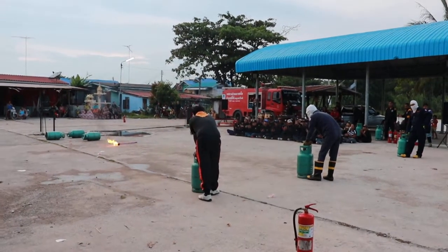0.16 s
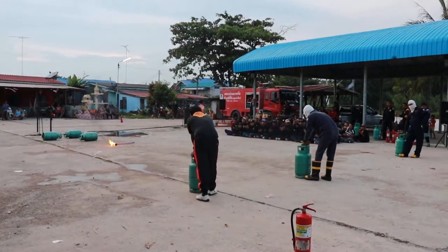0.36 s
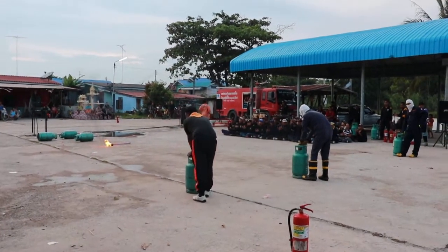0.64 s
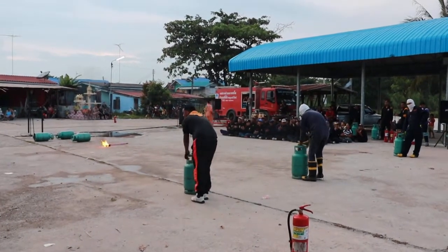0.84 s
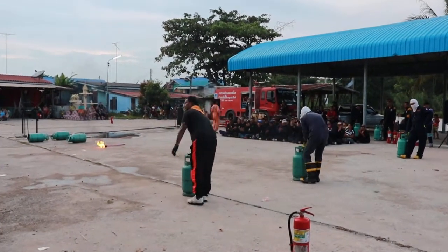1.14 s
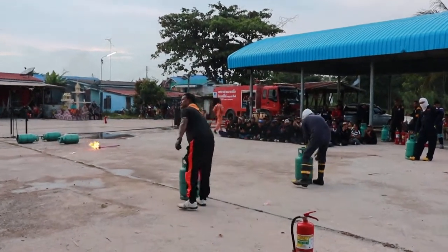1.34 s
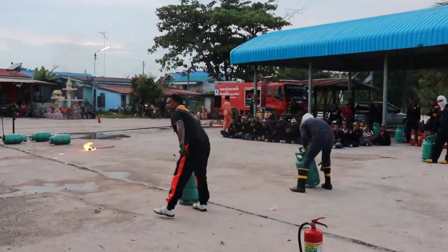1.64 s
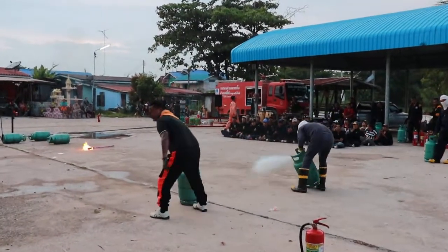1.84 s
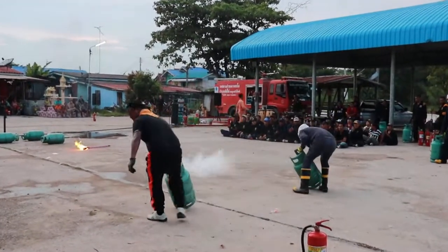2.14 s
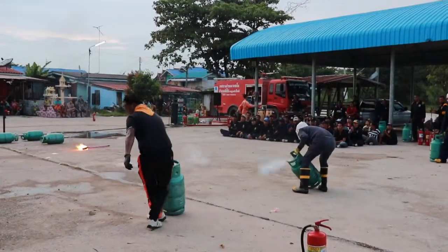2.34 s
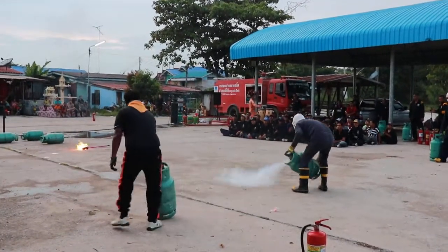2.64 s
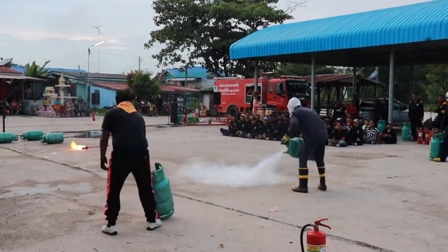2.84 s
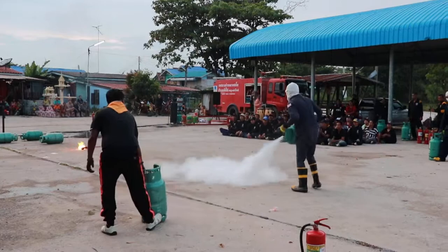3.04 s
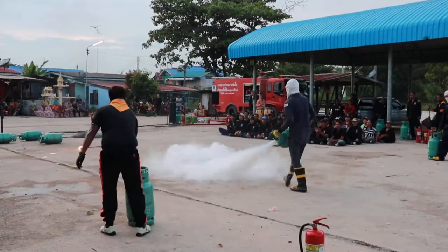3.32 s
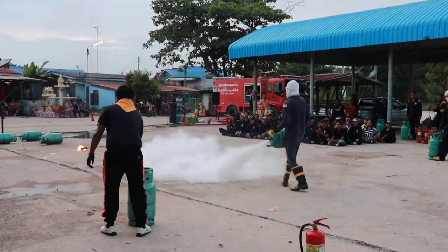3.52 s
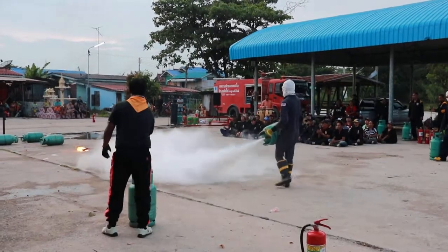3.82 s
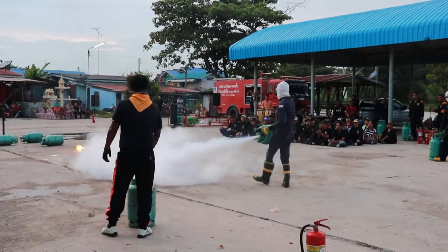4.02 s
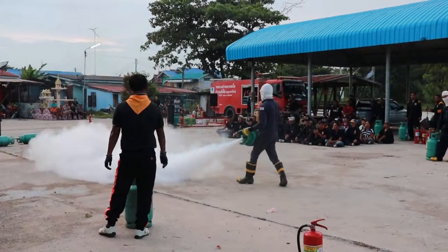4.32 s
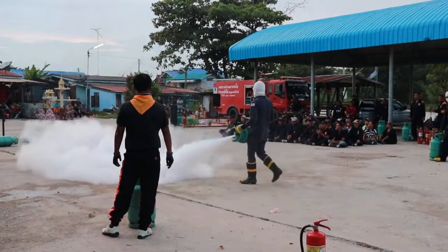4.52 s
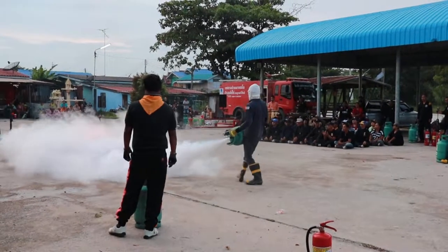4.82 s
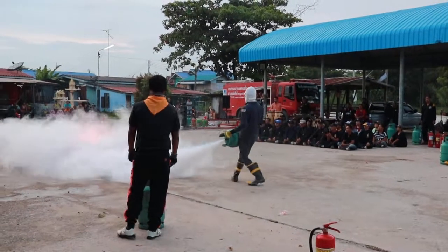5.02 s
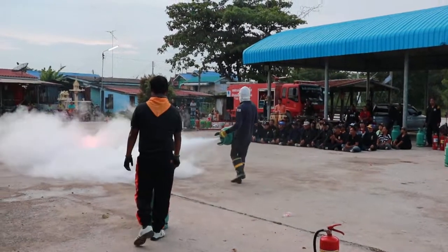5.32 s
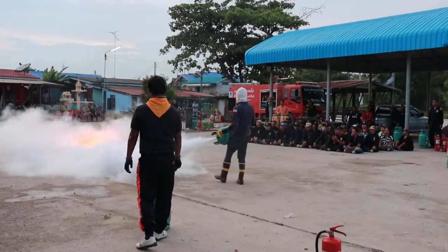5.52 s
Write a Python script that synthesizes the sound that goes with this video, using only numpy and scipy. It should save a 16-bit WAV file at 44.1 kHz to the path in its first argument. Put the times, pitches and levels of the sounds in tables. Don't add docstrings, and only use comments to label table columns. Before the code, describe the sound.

A strong, steady gas hiss begins at once in an open concrete yard, with a whistling core near 1.8 kHz and bright fizz above. Until about 1.8 s, dull, hollow valve-wheel knocks come irregularly, each with short yard echoes, while the fizz tightens and drops with the turns. From 1.35 to 2.05 s, sharp little finger ticks sit almost wholly at the left, with another near 2.9 s. The hiss dips briefly around 1.95 s. From 2.1 to 3.6 s, the tipped steel cylinder scrapes in stuttering metallic rings, strongest near 2.4 s; a faint ring returns at 4.9 s. Between 2.55 and 3.05 s the whistle yields to a broader, gusting jet. It swells near 3.6-4.15 s, eases, then surges again around 5.25 s. Low flame rumble rises from 3.1 s, strongest near 3.45 s, and continues to the end at about 5.6 s. A far engine idles very faintly throughout.

```python
import sys
import numpy as np
from scipy import signal
from scipy.fft import rfft, irfft
from scipy.io import wavfile
from scipy.ndimage import uniform_filter1d

SR = 44100
rng = np.random.default_rng(int(sys.argv[2]) if len(sys.argv) > 2 else 0)


def inscribe(sig):
    pcm = np.round(np.clip(np.atleast_2d(sig).T, -1, 1) * 32767)
    wavfile.write(sys.argv[1], SR, pcm.astype(np.int16))


def rack_gain(trim_db):
    fader = np.asarray(trim_db, float)
    return 10 ** (fader / 20)


N = 249606


def read(points, hz):
    f, value = np.transpose(points)
    return np.interp(np.log(hz + 1), np.log(f + 1), value)


def evened(x):
    return x / np.sqrt(np.mean(x ** 2) + 1e-20)


def add(mix, s, sound):
    part = mix[..., round(s * SR):][..., :sound.shape[-1]]
    part += sound[..., :part.shape[-1]]


def fuzz(x, width_hz):
    return signal.lfilter([1], [1, -np.exp(-np.pi * width_hz / SR)], x)


def blotches(shape, tall, long):
    field = rng.standard_normal(shape[::-1]).T
    for _ in range(2):
        field = uniform_filter1d(field, tall, axis=0)
        field = uniform_filter1d(field, long, axis=1)
    return evened(field)


def lasting(t, start, end):
    return np.clip(np.minimum(t - start, end - t) / .12, 0, 1)


def yard_db(hz, t):
    # (from t/s, to t/s, delay/ms, ripple/dB)
    echoes = [(-.3, 1.5, 1.02, .7), (.9, 2.05, 1.55, 2.2), (2.3, 3.05, 2.24, 2.), (2.3, 3.05, .99, 1.8),
              (2.95, 3.85, 1.38, 2.8), (3.75, 4.35, 1.24, 3.), (3.7, 4.95, 1.78, 1.8),
              (4.25, 4.85, 1.36, 2.6), (4.25, 4.95, 2.18, 1.8), (4.65, 5.15, 1.57, 2.),
              (4.85, 6., 1.92, 2.6), (4.85, 6., 1.05, 1.6)]
    hollows = [
        (1.97, 2.788, 920, 150., -6.5),
        (2, 3.334, 1520, 139, -3.5),
        (3.99, 4.27, 1600, 159, -11),
        (4.0, 4.425, 650, 198.9, -1),
    ]
    ridges = [
        (-.3, 1.9, 1850, 130., 4.5),
        (-.3, 2.3, 3000, 250., -5.),
        (3.65, 4.98, 5040, 110., 5.),
        (4.85, 6., 3780, 140., 3.5),
    ]
    # (from t/s, to t/s, f/Hz, width/Hz, level/dB)
    band_swells = [(0.4, 0.73, 1930, 270, 3.5), (0.92, 1.63, 1630, 210, 1), (1.19, 1.42, 2120, 150, -13),
                   (1.85, 2.135, 1620, 610, 6), (2.614, 2.846, 1750, 220, 10.5), (3.59, 3.95, 2300, 580, 4.5),
                   (3.98, 4.22, 11300, 5900, 5.5), (4.35, 4.9, 2080, 130, 4.5), (4.3, 4.94, 2970, 390, 2.5),
                   (2.86, 3.72, 5470, 220, 9), (4.57, 5.8, 11200, 810, 5.5), (4.3, 4.75, 1580, 250, -4.5),
                   (5.0, 5.75, 4450, 400., 2), (2.56, 2.92, 570, 170, 4.5), (1.6, 2.12, 1510, 110, -10.5),
                   (3.26, 4.2, 3670, 200., 2.5), (3.66, 4.25, 4550, 440, -2), (3.97, 4.18, 2080, 180, 8),
                   (4.95, 5.8, 3160, 310, -2), (2.9, 3, 11000, 1100, -2), (3, 3.8, 840, 86, 4.5),
                   (0, 1.05, 12600, 830, -6), (0.5, 1.56, 14500, 600., 5), (2, 2.9, 12300, 800, 4),
              (1.6, 2.9, 9200, 240, -3.5), (1.5, 2.95, 8100, 210, -2), (1.5, 2.9, 14600, 500., 5.5),
              (1.8, 2.1, 14600, 1200., -5), (2, 2.08, 10300, 290, -5), (3.15, 5.9, 15400, 300., -3),
              (-.3, 1.05, 11000, 220, -2.5), (2.5, 2.84, 9700, 400., 4), (3, 2.5, 10300, 600., -2.5),
              (2, 3.24, 8400, 480, 5), (4.15, 4.7, 10000, 400., -3), (.78, 1.12, 2200, 270, 3),
              (1, 1.59, 1880, 93, 4), (1.7, 2.26, 1980, 110., -5), (2.3, 2.4, 2250, 89, 4),
              (2, 2.66, 1760, 97, -5.5), (5, 5.9, 1860, 150., -3.5), (4, 5.15, 2400, 110, 2.5),
              (3.5, 4.8, 1830, 73, -3.5), (3.5, 4.2, 1550, 160, -4), (3.5, 4.1, 180, 180, 3.5),
              (3.5, 4.8, 280, 33, -3), (3.1, 3.66, 480, 70., -2), (4.5, 6.6, 276, 81, 3),
              (2.82, 3.23, 1620, 140., -7), (1.5, 1.38, 1830, 140, 2), (1.7, 2.48, 1800, 180, 4),
              (0.7, .7, 1480, 120., -3), (.95, 1.32, 1940, 90., -3), (5, 5.3, 1780, 160, -2),
              (1.5, 2.1, 10900, 180, -2.5), (3.95, 4.5, 2200, 140, -2), (5.45, 5.9, 690, 51, 5.5),
              (1.5, 2.15, 2250, 130, 3.5), (2.3, 2.78, 9800, 1300, -2), (2.5, 2.7, 800, 250., -2.5),
              (5, 5.15, 1700, 200., -2),
                   (1.5, 1.95, 6400, 300., 6), (-.2, 0.35, 5300, 220., -5), (3.5, 3.75, 4920, 150, -5),
              (1, 1.25, 6200, 230, -3), (2, 1.85, 3300, 200., -5), (1.5, 2.23, 3620, 200., -4.5),
              (2.5, 3.05, 6400, 300., 4), (3.15, 3.5, 6590, 220., -4), (2.55, 3.1, 3100, 160, -4),
              (.85, 1.2, 3850, 200., -4), (0.5, 0.28, 4100, 200, -2.5), (1.5, 1.87, 4100, 330, 3.5),
              (3.3, 5.9, 15600, 220., -3.5), (-.2, 0.12, 9850, 320, 5), (2.2, 2.55, 14850, 500., -4),
              (1.0, 1.35, 2550, 200., -4), (1.8, 2.05, 10600, 400., -4), (2, 1.76, 8300, 450., 5),
              (3.5, 4.08, 7750, 450., -5), (3.5, 5, 11200, 400., -4), (1, 0.93, 1750, 200., 3),
              (1.0, 1.4, 1820, 110, 2.5), (1.0, 1.26, 2300, 180, -1.5), (2.55, 2.9, 1570, 90., -4),
              (2.05, 2.4, 880, 130., -4), (0.5, .6, 690, 130., 4), (1, 1.7, 2800, 150., 4.5),
              (2.92, 3.25, 1460, 130., -3), (2.35, 2.6, 2030, 60., 5), (2, 3.2, 2200, 120., -6),
              (0.6, 1.1, 1390, 120, -3), (1.5, 1.73, 104, 50., 6), (5, 5.3, 110, 60., 5),
              (4, 5.0, 260, 43, -3), (4, 3.8, 110, 45, 4), (4.5, 4.8, 2260, 250., 1.5),
              (5.5, 5.5, 4200, 410, 1.5), (2, 1.95, 10200, 460, 2.5), (2.5, 2.45, 1560, 100., -3),
              (2, 1.85, 1740, 110, 2)]
    upper = np.interp(hz, [2500, 3500, 7500, 12000], [0, 1, 1, .4])
    total_db = np.zeros((len(hz), len(t)))
    for start, end, delay_ms, ripple_db in echoes:
        comb = upper * np.cos(2 * np.pi * hz * delay_ms / 1000)
        total_db += ripple_db * np.outer(comb, lasting(t, start, end))
    for start, end, f, width_hz, db in hollows + ridges + band_swells:
        bump = np.exp(-((hz - f) / width_hz) ** 2)
        total_db += db * np.outer(bump, lasting(t, start, end))
    return total_db


def turns_db(hz, t):
    # (step t/s, level/dB)
    turns = [
        (.312, 3.),
        (.592, 2.5),
        (.868, 2.5),
        (1.19, 0.5),
        (1.885, 5.),
        (2.03, -4.),
        (2.4, 1.5),
        (2.645, 1.5),
        (2.87, 2),
        (2.96, 2.5),
    ]
    squeeze_s, recover_s = 0.049, 0.064
    saw_db = np.zeros(len(t))
    for s, db in turns:
        rise, dip = np.exp(-abs(t - s) / squeeze_s), -np.exp(-abs(t - s) / recover_s)
        saw_db += db * np.where(t < s, rise, dip)
    return np.outer(np.interp(hz, [2500., 7000., 9500.], [0, .4, 1.1]), saw_db)


def layered(curve, law, usual_db, slides=()):
    s, level_db, pose = np.transpose(curve)
    bands_db = [level_db] + [db + share * (level_db - usual_db) + gain_db * pose for db, share, gain_db in law]
    centres_hz = [hz + per_s * (s - s[0]) + by_pose * pose for hz, per_s, by_pose in slides]
    return s, bands_db, centres_hz


def turbulence(layers, bands, left, right, same, turn, streak_db, patch_db, flicker_db, humps=(), frame=512):
    hz, t, z = signal.stft(rng.standard_normal((N, 2)).T, SR, nperseg=frame, noverlap=frame * 3 // 4)
    l, r = rack_gain(read(left, hz)), rack_gain(read(right, hz))
    c = np.clip(1.23 * read(same, hz), 0, .97)
    spin = np.exp(1j * read(turn, hz))
    centre = (l ** 2 + r ** 2 + 2 * l * r * c * spin.real) / 4 / len(hz)
    rest_db = [10 * np.log10(centre[(hz >= lo) & (hz < hi)].sum()) for lo, hi in bands]
    s, bands_db, centres_hz = layers
    lift_db = [np.interp(t, s, band_db) - rest for band_db, rest in zip(bands_db, rest_db)]
    mids = np.log(np.prod(bands, axis=1)) / 2
    order = np.argsort(mids)
    weights = np.array([np.interp(np.log(hz + 1), mids[order], order == k) for k in range(len(bands))])
    field = weights.T @ np.array(lift_db)
    for centre_hz, (hump_db, width_hz) in zip(centres_hz, humps):
        here = np.exp(-((hz[:, None] - np.interp(t, s, centre_hz)) / width_hz) ** 2)
        field += hump_db * (here - here.mean(1, keepdims=True))
    field += yard_db(hz, t) + turns_db(hz, t)
    field += streak_db * blotches(field.shape, tall=2, long=60)
    field += patch_db * blotches(field.shape, tall=5, long=12)
    field += flicker_db * blotches(field.shape, tall=120, long=2)
    at_left = (l * spin)[:, None] * z[0]
    at_right = r[:, None] * (c[:, None] * z[0] + np.sqrt(1 - c ** 2)[:, None] * z[1])
    pair = np.array([at_left, at_right]) * rack_gain(field)
    return signal.istft(pair, SR, nperseg=frame, noverlap=frame * 3 // 4)[1][:, :N]


def idle():
    # (f/Hz, level/dB, width/Hz)
    orders = [
        (50.6, -71, 5.2),
        (106.6, -66, 5),
    ]
    out, t = np.zeros(N), np.arange(N) / SR
    for hz, db, width_hz in orders:
        sway = fuzz(rng.standard_normal((N, 2)) @ [1, 1j], width_hz)
        out += rack_gain(db) * evened((sway * np.exp(2j * np.pi * hz * t)).real)
    return out * rack_gain([[1.4], [-1.6]])


def rumble():
    # (t/s, level/dB, gas cloud at the flame 0-1)
    flow = [(0.0, -56, 0.01), (1.3, -55.5, 0), (1.6, -55, 0.85), (2.0, -52.5, 0.1), (2.5, -55.5, 0.4),
            (3.1, -51.5, 0.9), (3.45, -44, 1), (4.05, -46.5, 0.4), (4.2, -47.5, 0.7), (4.8, -46, 0.95),
            (5.66, -49, 0.94)]
    # (low f/Hz, high f/Hz)
    bands = [
        (250, 600),
        (40, 250),
        (680, 1100),
    ]
    # (usual level/dB, share of level changes followed, gain by cloud/dB)
    law = [
        (-61, 0.55, 10),
        (-47, 0.47, 1.5),
    ]
    # (f/Hz, level/dB per Hz)
    left = [(15, -58), (25, -26), (41, -12), (75, -11.5), (102, -4.5), (233, -2.5), (357, -1), (399, -6),
            (593, -6.5), (867, -16), (1100, -10.5), (1430, -10), (2420, -120)]
    right = [(f, db - 3.2) for f, db in left]
    same, turn = [(30., 0.41), (150., 0.76), (800., 0.71)], [(30., 0.), (800., 0.0086)]
    return turbulence(layered(flow, law, usual_db=-50), bands, left, right, same, turn,
                      streak_db=-1.5, patch_db=1.0, flicker_db=0.98, frame=2048)


def knocks():
    # (t/s, peak level/dB, f/Hz, one third of echo t60/s)
    blows = [(0.019, -30, 1090, 0.055), (0.257, -33, 550, 0.04), (0.297, -28, 1040, 0.06),
             (0.457, -42, 322, 0.042), (0.495, -36.5, 460, 0.033), (0.564, -28.5, 940, 0.09),
             (0.655, -30, 1090, 0.05), (0.743, -33.5, 446, 0.016), (0.843, -26, 950, 0.042),
             (0.997, -38, 483, 0.023), (1.136, -27, 880, 0.14), (1.259, -36.5, 507, 0.027),
             (1.43, -25, 1060, 0.12), (1.527, -36, 400, 0.026), (1.747, -29.5, 902, 0.067),
             (2.342, -43, 633, 0.033), (3.534, -29, 945, 0.064), (.02, -39, 450, .03),
             (.705, -35, 1090, .04), (1.163, -38, 500, .05), (1.21, -35, 1040, .03), (1.805, -41, 500, .03),
             (1.905, -40, 775, .04), (1.992, -32, 1200, .03), (.268, -36, 800, .04), (.462, -37, 620, .04),
             (.11, -41, 600, .03), (1.265, -38, 700, .03), (.8, -35, 850, .03), (1.18, -40, 450, .04),
             (2.03, -37, 650, .06), (2.085, -37, 520, .03), (.555, -33, 1250, .03)]
    echo_gain = 0.71
    out, t = np.zeros((2, N)), np.arange(3000) / SR
    chance = rng.random((len(blows), 2, 16))
    for (s, db, hz, t60), draw in zip(blows, chance):
        decay = rack_gain(db - 60 * t / (8.4 / hz))
        blow = decay * np.sin(2 * np.pi * hz * t) * (1 - np.exp(-t / 0.00054))
        echoes = np.zeros((2, 3000))
        at = (100 + 2400 * draw[:, :8]).astype(int)
        sign = np.sign(draw[:, 8:] - .5)
        np.put_along_axis(echoes, at, echo_gain * sign * rack_gain(-60 * at / SR / max(3 * t60, .01)), 1)
        echoes[:, 0] = 1
        add(out, s, 2.8 * signal.fftconvolve(blow[None], echoes, axes=1))
    return out * rack_gain([[.7], [-.8]])


def ticks():
    # (t/s, peak level/dB, width factor)
    pushes = [(1.349, -41, 0.53), (1.383, -31, 1.5), (1.419, -29.5, 1.13), (1.454, -30, 0.93),
              (1.499, -24.5, 0.76), (1.559, -23, 0.96), (1.653, -23.5, 0.98), (1.84, -24.5, 0.79),
              (1.946, -22.5, 1.3), (1.987, -25, 1.04), (2.028, -24.5, 1.04), (2.341, -41, 0.94),
              (2.932, -28, 1.4)]
    out, t = np.zeros(N), np.arange(500) / SR
    fade = np.hanning(2 * len(t))[len(t):]
    for s, db, wide in pushes:
        u = t / (0.00048 * wide)
        shape = np.sin(np.pi * u ** .56) * np.exp(-u / 7)
        add(out, s + 0.00508, rack_gain(db + 5.0) * shape * fade)
    return out * rack_gain([[0.], [-24.]])


def cylinder():
    # (f/Hz, width/Hz, wander/rad)
    wall = [
        (622, 16., .9),
        (1270, 9., .35),
        (1862, 6., .8),
        (2616, 16., 1.),
    ]
    # (t/s, length/s, level/dB)
    drags = [
        [(2.12, .1, -53), (2.335, 0.019, -42), (2.39, 0.11, -44), (2.52, 0.068, -51), (2.6, .08, -55),
         (2.73, .04, -49), (3.05, 0.087, -51.5), (3.14, 0.15, -45), (3.3, .05, -52), (4.93, .06, -45)],
        [(2.1, .1, -48), (2.22, 0.031, -44), (2.28, .13, -47), (2.42, .08, -33.5), (2.52, 0.15, -38),
         (2.72, 0.02, -46.5), (2.76, .17, -47), (2.95, 0.031, -37.5), (3.0, 0.044, -41), (3.06, .07, -53),
         (3.145, 0.023, -33), (3.22, 0.015, -32.5), (3.265, 0.027, -47), (3.4, .11, -46), (3.53, 0.02, -29),
         (3.57, .06, -51)],
        [(2.12, 0.049, -34), (2.35, 0.047, -28), (2.19, 0.098, -35.5), (2.41, 0.03, -20), (2.46, 0.054, -28.5),
         (2.85, .06, -42), (2.97, 0.035, -27.5), (3.02, 0.046, -39), (3.105, 0.014, -33), (3.14, 0.083, -31.5),
         (3.26, 0.018, -29), (3.53, 0.021, -33), (4.92, .08, -41)],
        [(3.1, .02, -43), (3.15, 0.056, -41), (3.22, .03, -43), (3.53, 0.03, -43)],
    ]
    bite_s, let_go_db_per_s = 0.011, 330
    t, out = np.arange(N) / SR, np.zeros(N)
    for (hz, width_hz, wander), mode_drags in zip(wall, drags):
        drift, grip = (evened(fuzz(v, width_hz)) for v in rng.standard_normal((N, 2)).T)
        stutter_db = 2.0 * evened(uniform_filter1d(grip, size=700))
        press = np.zeros(N)
        for s, length, db in mode_drags:
            bite = np.clip((t - s) / bite_s, 0, 1)
            hold = rack_gain(db - let_go_db_per_s * np.maximum(t - s - length, 0))
            press = np.maximum(press, bite * hold)
        phase = wander * drift + 1.53 * evened(uniform_filter1d(drift, size=6000))
        out += press * rack_gain(stutter_db + 3.5) * np.sin(2 * np.pi * hz * t + phase)
    return out * rack_gain([[1.5], [-1.6]])


def valve_hiss():
    # (t/s, level/dB, tip towards the camera 0-1.3)
    flow = [(0.0, -28.5, 0), (0.15, -29.5, 0.14), (0.55, -29.5, 0), (0.68, -32, 0.29), (0.85, -29.5, 0.06),
            (1.0, -31.5, 0), (1.1, -29.5, 0.31), (1.42, -32.5, 0), (1.65, -29.5, 0.12), (1.85, -28.5, 0),
            (1.95, -41, 0.43), (2.05, -31, 0.95), (2.3, -29.5, 0.64), (2.5, -32, 0.93), (2.72, -33.5, 1.3),
            (2.82, -30.5, 0.1), (2.9, -33.5, 0.2), (3.05, -23, 1)]
    # (low f/Hz, high f/Hz)
    bands = [
        (8000, 11000),
        (1400, 2600),
        (3300, 6500),
        (11500, 15000),
    ]
    # (usual level/dB, share of flow changes followed, gain by tipping/dB)
    law = [
        (-29.5, 0.87, 4),
        (-33.5, 0.46, 5.5),
        (-36.5, 0.71, 0),
    ]
    # (start f/Hz, slide/Hz per s, gain by tipping/Hz)
    whistle = [
        (1730, -34, 170),
    ]
    # (f/Hz, level/dB per Hz)
    left = [(690, -44), (1210, -23.5), (1890, 0), (2930, -9), (3270, -14), (3960, -4.5), (5510, -9),
            (5860, -5), (7580, -9), (9820, -3.5), (11200, -18.5), (13260, -30.5), (14640, -30),
            (14990, -28.5)]
    right = [(690, -29.5), (1210, -20.5), (1890, -7), (2410, -12.5), (3100, -8), (4820, -19), (6030, -15.5),
             (7920, -12), (8610, -12), (10160, -15.5), (10510, -11), (11200, -34), (13610, -26),
             (14990, -52)]
    # (f/Hz, left-right likeness 0-1)
    same = [(690, 0.19), (1720, 0.78), (2930, 0.48), (6720, 0.49), (7900, 0.57), (8610, .28), (10160, 0.75),
            (12750, 0.31), (13950, 0.62), (14990, 0.73)]
    # (f/Hz, left lead/rad)
    turn = [(690, 0.3), (1550, -0.0), (3100, -2.3), (3620, 0.0), (7240, -4.1), (8270, -2.8), (8610, -4.4),
            (9470, -4.4), (11020, -6.6), (12750, -10.6), (13440, -9.4), (14990, -11.6)]
    low = [(150., -45.0), (500., -32.0)]
    return turbulence(layered(flow, law, -30, whistle), bands, low + left, low + right, same, turn,
                      streak_db=1.5, patch_db=0.97, flicker_db=0.3, humps=[(12.6, 250.0)])


def carried_jet():
    # (t/s, level/dB, swing across the camera 0-1)
    flow = [(2.8, -25.5, 0.05), (3.0, -36, 0.7), (3.2, -35, 1), (3.35, -31, 0.8), (3.6, -26, 0.52),
            (3.7, -26.5, 0.5), (3.85, -23.5, 0.1), (4.03, -24, 0.52), (4.13, -22, 0), (4.2, -29.5, 0.16),
            (4.35, -29.5, 1), (4.55, -25.5, 0.64), (4.8, -27, 0.54), (5.05, -26.5, 0.8), (5.25, -24, 0.5),
            (5.45, -27, 0.6), (5.66, -26.5, 0.4)]
    # (low f/Hz, high f/Hz)
    bands = [
        (3300, 6500),
        (900, 1600),
        (1700, 2900),
        (8000, 15000),
    ]
    # (usual level/dB, share of flow changes followed, gain by swing/dB)
    law = [
        (-38.5, 1, 8),
        (-32.5, 0.53, 5),
        (-38, 0.13, 0.5),
    ]
    # (start f/Hz, slide/Hz per s, gain by swing/Hz)
    plume = [
        (2140, 69, 50),
        (4060, 38, 100),
    ]
    # (f/Hz, level/dB per Hz)
    left = [(690, -34), (1210, -9), (1720, -3.5), (2240, 5), (3270, -12), (4130, 1.5), (5340, -8),
            (6370, -3.5), (7920, -13.5), (9470, -8), (11020, -16), (11370, -18.5), (12400, -16),
            (14990, -21.5)]
    right = [(690, -22), (1210, -8.5), (1720, -10.5), (2240, -1.5), (2760, -8.5), (3620, -5.5),
             (5000, -20.5), (5340, -16), (7240, -13.5), (8270, -16.5), (9470, -15), (11370, -32),
             (13260, -24.5), (14990, -47)]
    # (f/Hz, left-right likeness 0-1)
    same = [(690, 0.77), (1720, 0.66), (2410, 0.85), (3620, 0.46), (4650, 0.96), (5680, 0.39), (6550, 0.48),
            (7240, 0.35), (9130, 0.58), (9990, 0.34), (10850, 0.46), (12750, .2), (14990, 0.4)]
    # (f/Hz, left lead/rad)
    turn = [(690, -0.1), (1720, 0.4), (2930, -1.4), (3270, -0.9), (3620, 1.1), (6720, -2.7), (8270, -1.5),
            (9820, -3.5), (10680, -7.1), (12750, -9.7), (12920, -7.6), (14990, -10.9)]
    low = [(150., -45.0), (500., -32.0)]
    return turbulence(layered(flow, law, -27, plume), bands, low + left, low + right, same, turn,
                      streak_db=1.4, patch_db=0.7, flicker_db=0.6, humps=[(3.9, 220.0), (5.3, 650.0)])


def jets():
    # (from t/s, to t/s)
    handover = (2.55, 3.07)
    angle = np.interp(np.arange(N) / SR, handover, [0, np.pi / 2])
    return valve_hiss() * np.cos(angle) + carried_jet() * np.sin(angle)


def scene():
    return idle() + rumble() + knocks() + ticks() + cylinder() + jets()


def roll_off(x):
    return signal.sosfilt(signal.butter(12, 15830, fs=SR, output="sos"), x)


def record(dry):
    hz = np.fft.rfftfreq(N, 1 / SR)
    edge_hz, rolloff_hz = 15800, 41.0
    dips_db = -14. * np.exp(-((hz - 15180.) / 60.) ** 2) - 5.5 * np.exp(-((hz - 11280.) / 89.0) ** 2)
    shelf_db = 1.8 * (hz > 15170.)
    colour = rack_gain(dips_db + shelf_db) * (hz < edge_hz) / np.sqrt(1 + (rolloff_hz / (hz + 1)) ** 6)
    return roll_off(irfft(rfft(dry) * colour, N))


dry = scene()
out = record(dry)
inscribe(out)
```